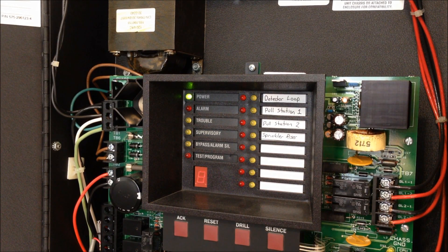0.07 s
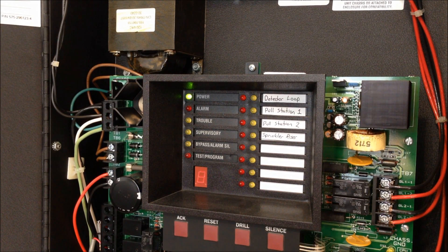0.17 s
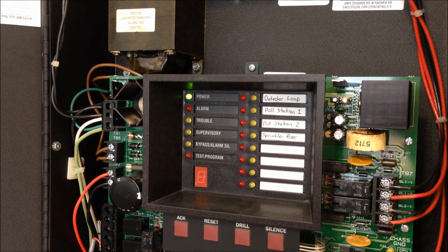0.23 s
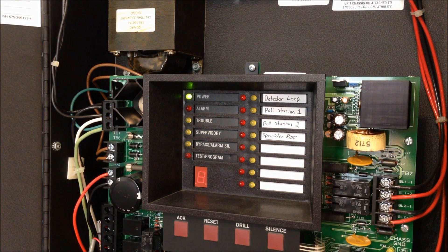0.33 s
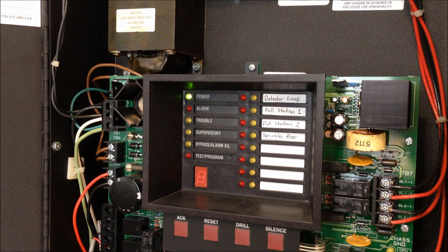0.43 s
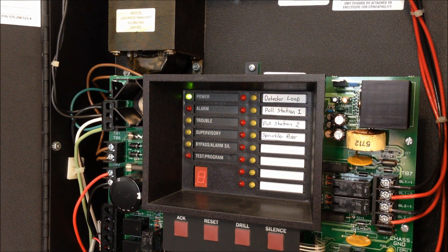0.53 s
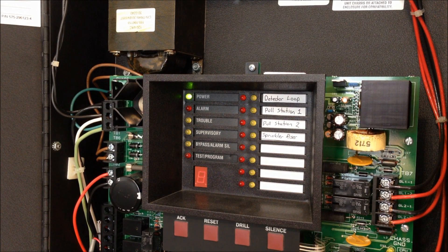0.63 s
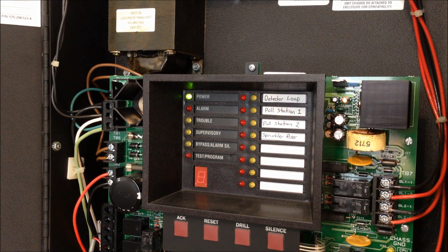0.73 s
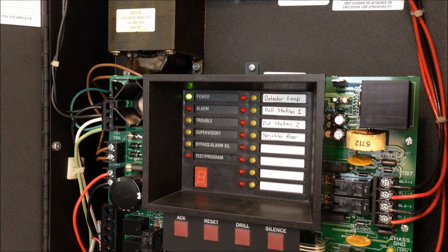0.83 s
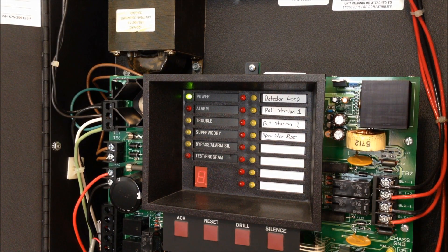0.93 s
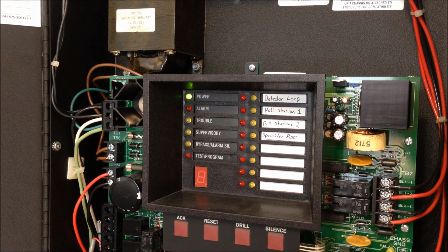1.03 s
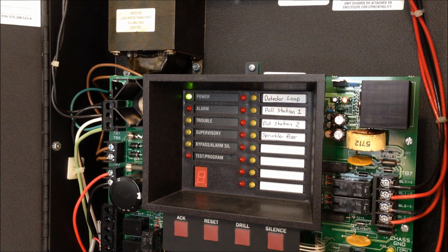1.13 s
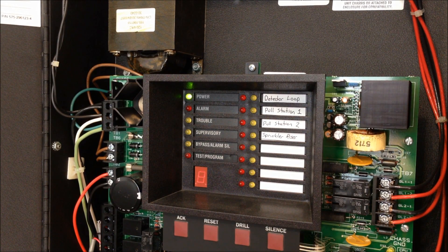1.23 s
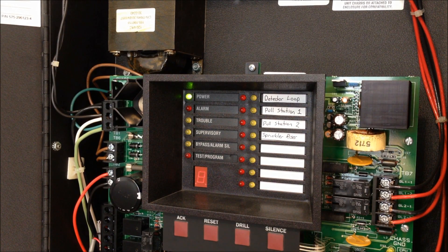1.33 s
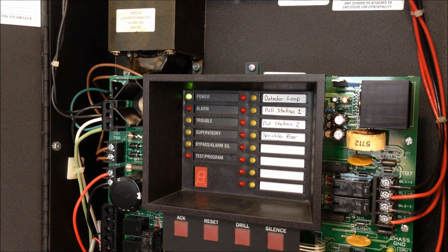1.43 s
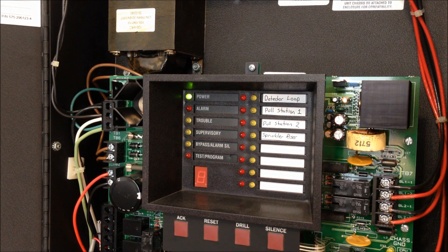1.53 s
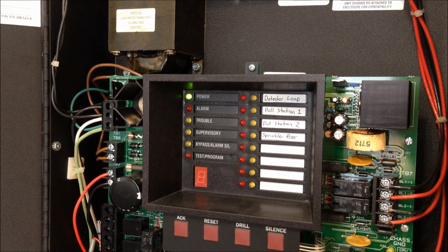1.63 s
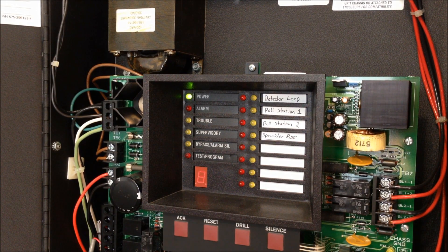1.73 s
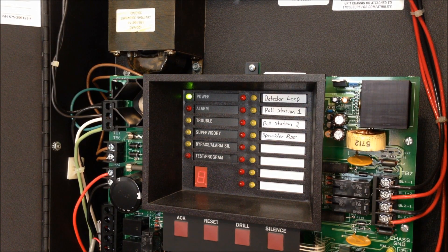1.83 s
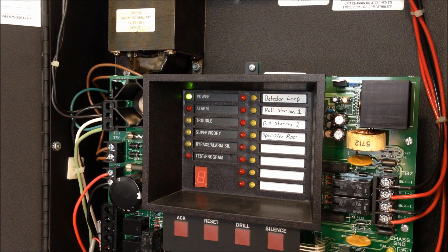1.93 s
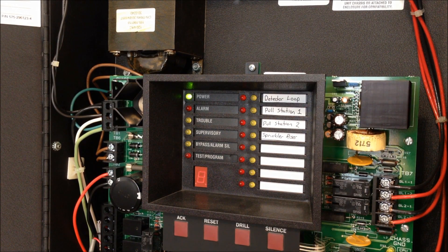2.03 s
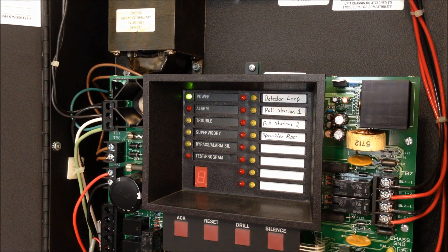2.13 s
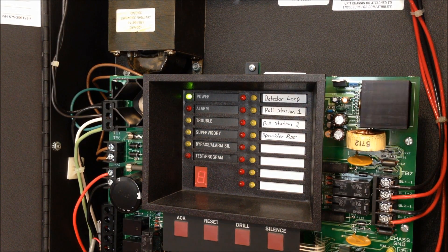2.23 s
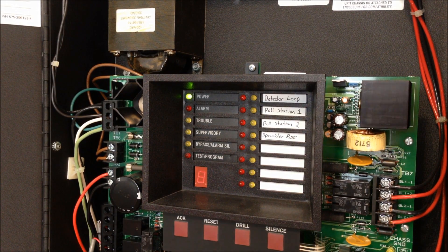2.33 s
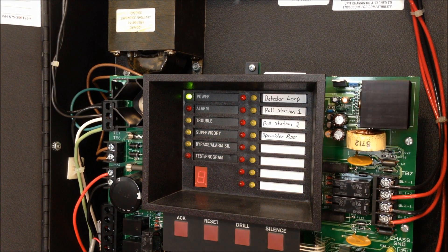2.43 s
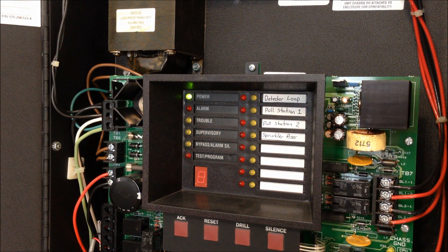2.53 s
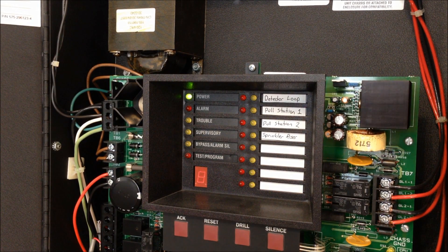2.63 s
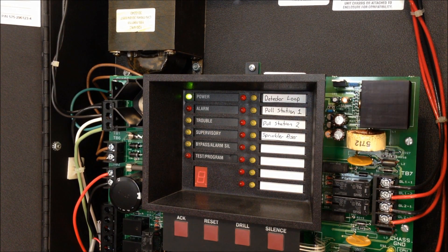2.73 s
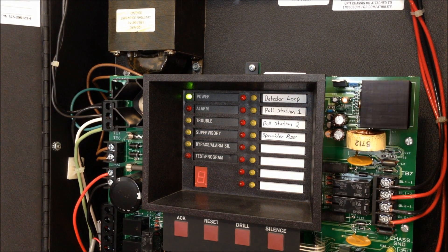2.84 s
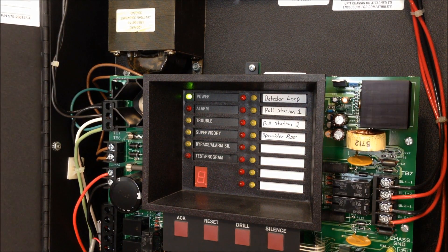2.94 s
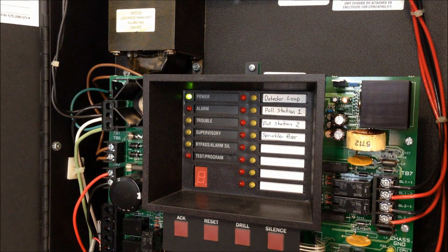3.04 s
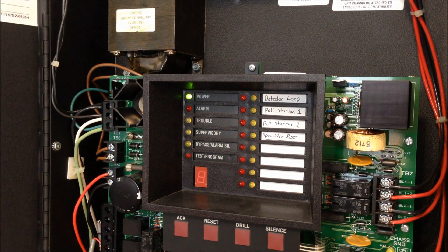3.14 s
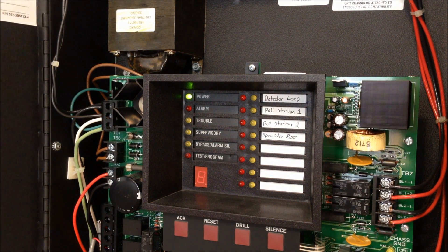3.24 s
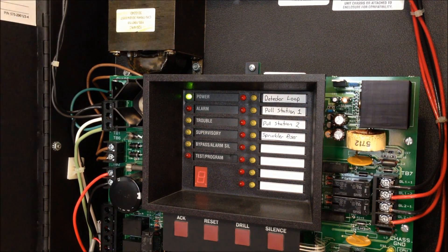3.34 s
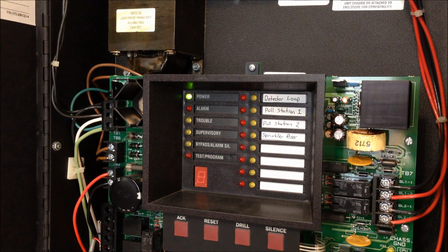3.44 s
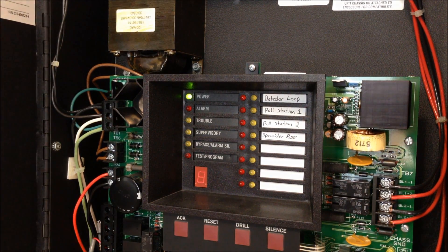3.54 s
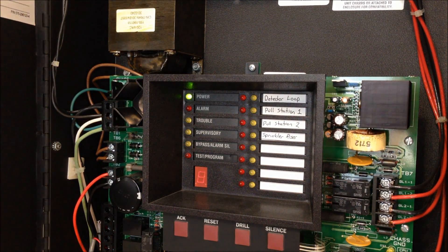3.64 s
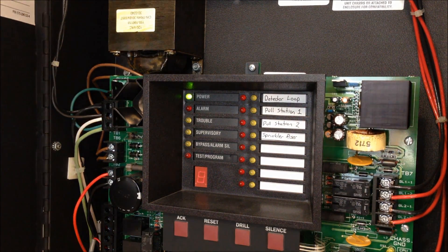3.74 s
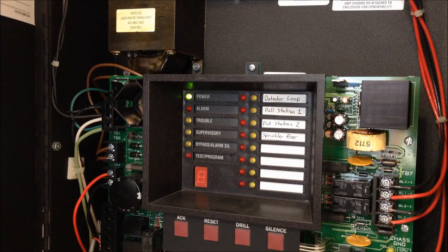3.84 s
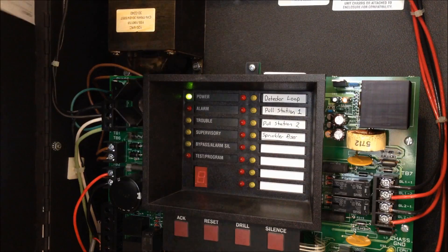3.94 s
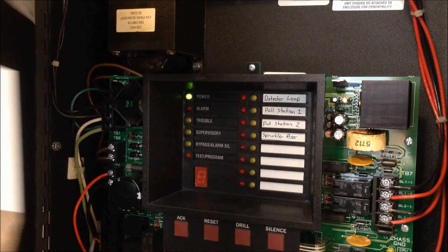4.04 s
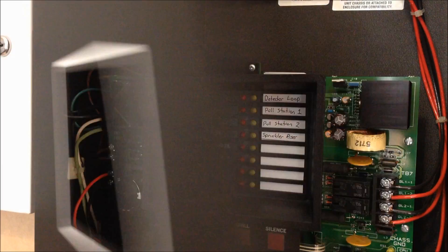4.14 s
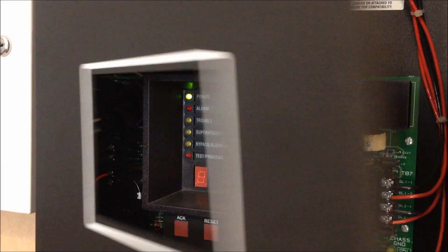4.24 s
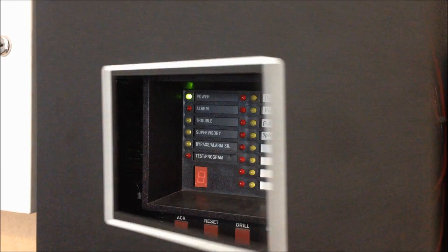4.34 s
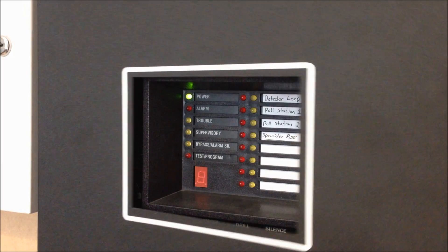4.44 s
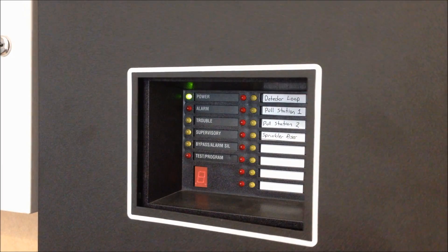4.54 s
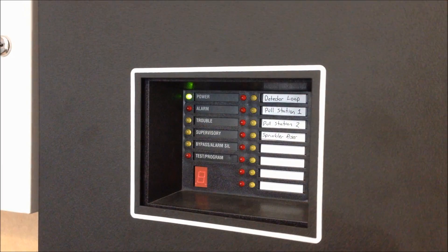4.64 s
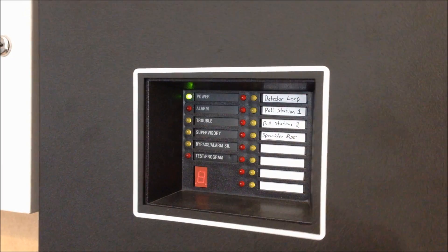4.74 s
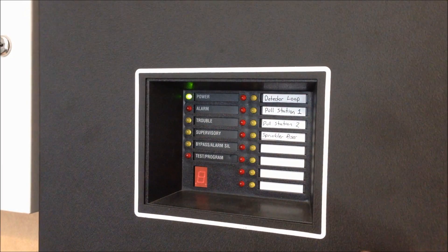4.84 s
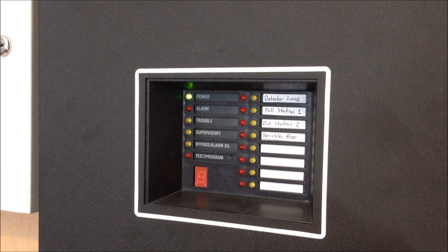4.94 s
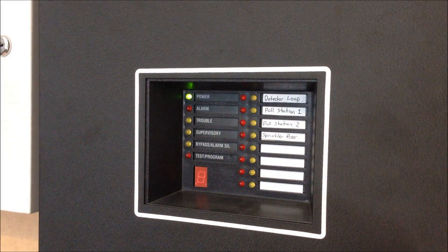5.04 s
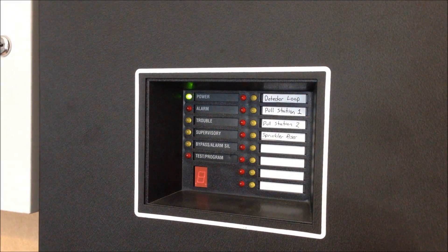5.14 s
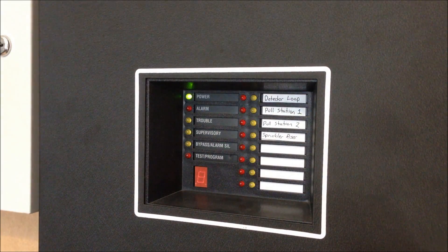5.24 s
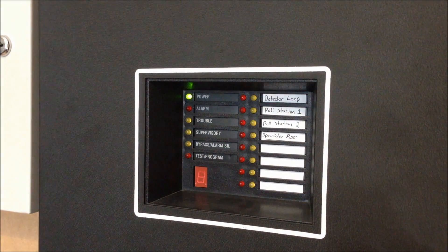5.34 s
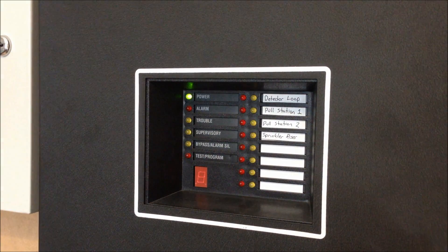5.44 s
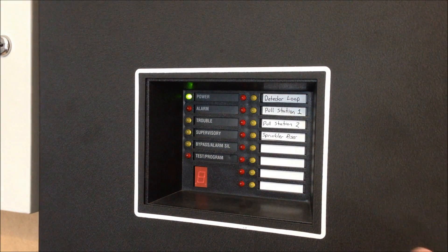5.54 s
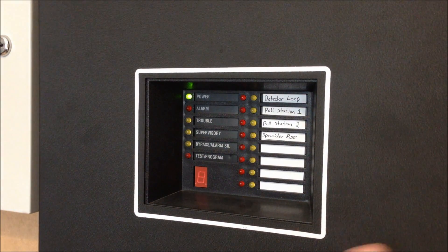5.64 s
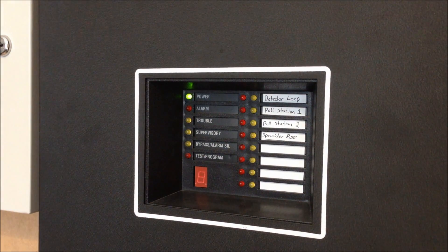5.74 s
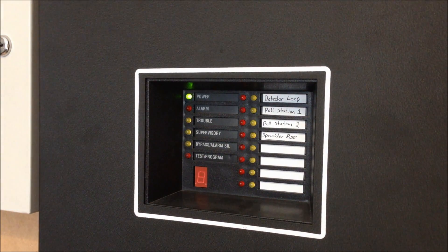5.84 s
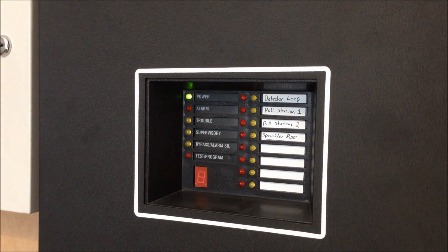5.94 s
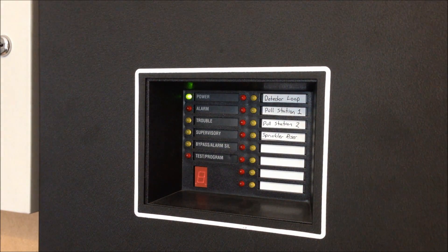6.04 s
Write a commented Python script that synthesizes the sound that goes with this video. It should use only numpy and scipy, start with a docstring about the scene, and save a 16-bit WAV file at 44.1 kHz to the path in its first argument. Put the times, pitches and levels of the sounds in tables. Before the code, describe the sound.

In a small, quiet room, a plastic button clicks down and up with a brief ring from the panel behind it, then clicks once more. A steel cabinet door is handled and swings with light ticks and clacks. It bangs shut with a short hollow boom and is pressed home with a few knocks and rattles. The microphone is close, over faint air noise and hum.

```python
"""Button and steel cabinet door

A small, quiet room, one microphone close to a steel wall cabinet. A plastic button snaps over and rings
the control panel inside. The sheet-metal door is taken in hand, swings on a ticking hinge, bangs shut
with a boom and is pressed home with a few rattles. Under it lie air noise, a faint low engine-like tone
beside the mains hum, and a low drone that swells and fades."""
import sys
import numpy as np
from scipy import signal
from scipy.fft import irfft
from scipy.io import wavfile

SR = 44100
rng = np.random.default_rng(int(sys.argv[2]) if len(sys.argv) > 2 else 0)


def master_out(mix):
    """Clip the mix to full scale and print it as 16-bit PCM to the path in sys.argv[1]."""
    frames = np.transpose(np.atleast_2d(mix))
    ceiling = np.clip(frames, -1, 1)
    pcm = np.round(ceiling * 32767).astype(np.int16)
    wavfile.write(sys.argv[1], SR, pcm)


N = 267995
TIME = np.arange(N) / SR
AGE = TIME[:SR]   # the second after a contact

# spectrum of the air in the room: frequency_hz, relative_db
AIR_SPECTRUM = [(15, -47), (25, -20.5), (80, -0.5), (141, -5.5), (179, -3), (211, -10.5), (235, -8),
                (284, -11.5), (361, -9), (392, -15.5), (437, -17.5), (1280, -29), (3780, -23.5),
                (14200, -25.5), (15800, -31)]
# a low engine-like tone, then three harmonics of the mains hum: pitch_hz, rms_db
STEADY_TONES = [(76, -80), (120, -82), (240, -81.5), (360, -83.5)]
# switch snaps: start_s, level_db, tilt_db_per_octave, edge_db, ring_db, stroke (down or up)
BUTTON_STROKES = [(1.1459, -31.5, -0.5, 4, -42, "down"), (1.2148, -28, -0.5, -2.5, -37, "up"),
                  (3.0346, -32, -0.5, 4.5, -44, "down")]
# snap of the plastic: frequency_hz, relative_db
PLASTIC_SPECTRUM = [(400, -25), (680, -9.5), (850, -4.5), (1400, 2), (2000, -0.5), (2550, -12), (3400, 1.5),
                    (5200, 2), (6400, -4), (7400, -3.5), (10700, -8.5), (13900, -4.5), (15300, -15)]
# modes of the panel behind the button: pitch_hz, down_stroke_db, up_stroke_db, t60_s
PANEL_MODES = [(651, -9, -16.5, 0.1), (809, -31, -21, 0.15), (1109, -8, -5.5, 0.12),
               (1173, -16.5, -18.5, 0.33), (1332, -2, 1, 0.062), (1440, -4, -16, 0.13),
               (1680, -4, -10, 0.11), (3260, -13, 7, 0.015), (3546, -0.5, -6, 0.071),
               (3950, -9.5, -4.5, 0.075), (4340, -11, -15, 0.12), (4820, -8, -22, 0.049),
               (4930, 2, -19, 0.048), (5570, 4, -10, 0.041), (7220, -21, 11, 0.012),
               (7470, -32, -12.5, 0.22)]
# bare steel contact: frequency_hz, relative_db
STEEL_SPECTRUM = [(100, -15), (200, -9.5), (350, 1.5), (620, 0.5), (850, -5), (1500, -1), (2100, -5.5),
                  (2800, -3.5), (5000, 0.5), (7200, -2), (9000, -1.5), (11500, -7), (15000, -12.5)]
# rubbing on the steel: firmest_s, level_db, half_length_s, cutoff_hz
STEEL_RUBS = [(3.341, -64.5, 0.022, 2700), (3.739, -46.5, 0.016, 2730), (4.029, -56.5, 0.015, 2700),
              (4.94, -51.5, 0.019, 4000), (5.113, -41, 0.016, 8000)]
# single ticks of the hinge and lock: start_s, level_db, edge_db
HINGE_TICKS = [(3.339, -62.5, -1), (3.765, -45.5, -5), (3.803, -48, 3), (3.8648, -48.5, -7),
               (4.101, -60, -2), (4.1423, -59, 4), (4.159, -58.5, 2), (4.3526, -63.5, -13),
               (5.1066, -41, 23), (5.255, -53.5, 12), (5.3857, -61.5, -2), (5.4607, -50, 10.5)]
# a loose part lifts and drops: start_s, click_db, fall_s, drop_db, body_db, resonance_hz
LOOSE_CLACKS = [(3.3989, -44, 0.0047, -39.5, -6, 2060), (3.7387, -32.5, 0.0017, -29, -0.5, 7200),
                (4.238, -46, 0.0083, -43, -7.5, 5760)]
# clash of the door's crowded upper modes: frequency_hz, relative_db
CLASH_SPECTRUM = [(30, -13.5), (75, -14), (150, 2.5), (270, -8), (400, -0.5), (540, -6), (900, -1.5),
                  (1800, -3.5), (3500, -4), (6000, -2), (8000, -8), (11000, -17.5), (15000, -23.5)]
# modes of the free door sheet: pitch_hz, level_db, t60_s
SHEET_MODES = [(55, -14, .45), (106, -14, .58), (127, -10, .22), (145, -12, .6), (177, -5, .33),
               (208, 5, .23), (228, -7, .58), (248, -8, .56), (295, -3, .2), (340, -18, .45),
               (388, -12, .56), (418, -5, .18), (441, -9, .25), (461, -6, .33), (624, -7, .22),
               (836, -7, .17), (922, -10, .2), (1158, -13, .2), (1285, -14, .14), (1622, -16, .22),
               (1671, -13, .26), (1888, -12, .16), (2280, -14, .15), (2464, -14, .15), (3555, -12, .13),
               (3714, -10, .14), (5160, -10, .13), (6367, -12, .13)]
# the sheet flexes: start_s, level_db, cutoff_hz
FLEX_THUDS = [(3.622, -61, 210), (4.927, -40, 300), (5.01, -26.5, 200), (5.263, -38, 280),
              (5.778, -37, 80.1)]
# the held door knocks: start_s, level_db, cutoff_hz
HELD_KNOCKS = [(3.7404, -56.5, 990), (4.013, -67.5, 5000), (5.108, -45.5, 1490), (5.2747, -42.5, 7080),
               (5.714, -54.5, 5010)]
# the door meets the frame with corner, full edge and rebound: start_s, clash_db, ring_db, cutoff_hz
SLAM_LANDINGS = [(4.9343, -20.5, -34.5, 7480), (4.9417, -15, -24.5, 14750), (4.9749, -21.5, -50, 9000)]
# reverberation of the small room: frequency_hz, t60_s
ROOM_DECAY = [(100, 0.87), (300, 0.43), (1000, 0.21), (4000, 0.15), (8000, 0.11), (15000, 0.13)]

BODY_HZ, EDGE_HZ = 2200, 12200   # body_db shelves the sound below the first, edge_db above the second


def from_db(db):
    """Decibels as an amplitude factor."""
    return 10 ** (np.asarray(db) / 20)


def at_hz(points, hz):
    """Reads a table on a log-frequency axis."""
    known_hz, values = np.transpose(points)
    return np.interp(np.log(np.maximum(hz, 1)), np.log(known_hz), values)


def decay(t60_s):
    """Envelope that loses 60 dB in t60_s."""
    return from_db(-60 * AGE / max(t60_s, 0.002))


def attack(rise_s):
    """A contact takes a moment to build."""
    return 1 - np.exp(-AGE / rise_s)


def noise(spectrum, size, shade_db=lambda hz: 0):
    """Noise of rms 1 with the given spectrum, then shaded by some dB at each frequency."""
    hz = np.fft.rfftfreq(size, 1 / SR)
    shape = from_db(at_hz(spectrum, hz))
    gain = shape / np.sqrt(np.mean(shape ** 2)) * from_db(shade_db(hz))
    phases = np.exp(2j * np.pi * rng.random(len(hz)))
    return irfft(gain * phases, size) * np.sqrt(size)


def above(hz, corner_hz):
    """Share, 0 to 1, of a smooth shelf that opens above its corner."""
    return hz ** 4 / (hz ** 4 + corner_hz ** 4)


def soften(x, cutoff_hz):
    """A longer, softer contact loses its treble."""
    return signal.sosfilt(signal.butter(2, cutoff_hz, fs=SR, output="sos"), x)


def ring(modes, scatter_db):
    """Struck modes; each blow lands elsewhere and shares its energy a little differently."""
    strengths = from_db(scatter_db * rng.standard_normal(len(modes)))
    return sum((-1) ** k * strengths[k] * from_db(db) * decay(t60_s) * np.sin(2 * np.pi * hz * AGE)
               for k, (hz, db, t60_s) in enumerate(modes))


def add(track, start_s, sound):
    """Lays a sound into the track at start_s."""
    start = round(start_s * SR)
    track[start:start + len(sound)] += sound[:N - start]


def room_tone(air_db=-67.5):
    """Air noise fills the quiet room, with a faint low engine-like tone beside the mains hum."""
    air = from_db(air_db) * noise(AIR_SPECTRUM, N)
    tones = sum(from_db(db) * np.sqrt(2) * np.sin(2 * np.pi * (hz * TIME + rng.random()))
                for hz, db in STEADY_TONES)
    return air + tones


def button():
    """The switch snaps over and the panel behind it rings, differently on the way down and up."""
    snaps, rings = np.zeros((2, N))
    for start_s, level_db, tilt_db, edge_db, ring_db, stroke in BUTTON_STROKES:
        snap = noise(PLASTIC_SPECTRUM, SR,
                     lambda hz: tilt_db * np.log2((hz + 1) / 4000) + edge_db * above(hz, EDGE_HZ))
        modes = [(hz, down_db if stroke == "down" else up_db, t60_s)
                 for hz, down_db, up_db, t60_s in PANEL_MODES]
        add(snaps, start_s, from_db(level_db) * snap * decay(t60_s=0.041) * attack(rise_s=0.00043))
        add(rings, start_s, from_db(ring_db) * ring(modes, scatter_db=0.5))
    # so small a panel radiates no bass
    return signal.sosfilt(signal.butter(4, 530, "high", fs=SR, output="sos"), [snaps, rings])


def drone(start_s=1.24, swell_s=0.42, hold_s=0.24, level_db=-60.5, fade_db_per_s=19.5):
    """A low tone swells, holds and fades while its pitch creeps up, bringing some rumble with it."""
    age = TIME - start_s
    fading_s = np.maximum(age - swell_s - hold_s, 0)
    envelope = np.clip(age / swell_s, 0, 1) * from_db(level_db - fade_db_per_s * fading_s)
    pitch_hz = 113 + 3 * age
    tone = np.sqrt(2) * np.sin(2 * np.pi * np.cumsum(pitch_hz) / SR)
    rumble = noise([(20, -30), (50, 4), (150, -2.0), (300, -21.5), (900, -82)], N)
    return envelope * (tone + from_db(-6.5) * rumble)


def rubs():
    """Surfaces slide in short scuffs that swell and fade around the ticks and knocks."""
    scuff = noise(STEEL_SPECTRUM, N)
    track = np.zeros(N)
    for firmest_s, level_db, half_length_s, cutoff_hz in STEEL_RUBS:
        swell = np.exp(-np.minimum(((TIME - firmest_s) / half_length_s) ** 2, 50))
        track += from_db(level_db) * swell * soften(scuff, cutoff_hz)
    return track


def tick(level_db, body_db, resonance_hz, edge_db, t60_s):
    """A steel part knocks and resonates; firm touches reach the sheet (body), sharp ones sparkle (edge)."""
    def shade_db(hz, peak_db=6, half_width_octaves=0.24):
        octaves_off = np.log2((hz + 1) / resonance_hz)
        resonance_db = peak_db / (1 + (octaves_off / half_width_octaves) ** 2)
        return resonance_db + body_db * (1 - above(hz, BODY_HZ)) + edge_db * above(hz, EDGE_HZ)
    contact = noise(STEEL_SPECTRUM, SR, shade_db)
    return from_db(level_db) * contact * decay(t60_s) * attack(rise_s=0.00045)


def hinge_and_lock():
    """Loose parts lift with a click and drop on their seats, among single ticks of hinge and lock."""
    track = np.zeros(N)
    for start_s, click_db, fall_s, drop_db, body_db, resonance_hz in LOOSE_CLACKS:
        add(track, start_s, tick(click_db, body_db, resonance_hz, edge_db=3.5, t60_s=0.034))
        add(track, start_s + fall_s, tick(drop_db, body_db, resonance_hz, edge_db=-14, t60_s=0.06))
    for start_s, level_db, edge_db in HINGE_TICKS:
        add(track, start_s, tick(level_db, body_db=-3, resonance_hz=7200, edge_db=edge_db, t60_s=0.087))
    return track


def clash(level_db, cutoff_hz):
    """The crowded upper modes of the door, struck once, blur into a burst of noise."""
    burst = noise(CLASH_SPECTRUM, SR) * decay(t60_s=0.089) * attack(rise_s=0.0006)
    return from_db(level_db) * soften(burst, cutoff_hz)


def boom(level_db, cutoff_hz, pitch_ratio=1):
    """The door sheet's own modes, struck once."""
    modes = [(hz * pitch_ratio, db, t60_s) for hz, db, t60_s in SHEET_MODES]
    return from_db(level_db) * soften(ring(modes, scatter_db=2.0), cutoff_hz)


def pressed_boom(level_db, cutoff_hz):
    """Pressed firmly, the sheet rings lower and much shorter."""
    return boom(level_db, cutoff_hz, pitch_ratio=0.88) * decay(t60_s=0.14)


def door_thuds(ring_db=-7):
    """The sheet flexes with a dull thud."""
    clashes, booms = np.zeros((2, N))
    for start_s, level_db, cutoff_hz in FLEX_THUDS:
        add(clashes, start_s, clash(level_db, cutoff_hz))
        add(booms, start_s, pressed_boom(level_db + ring_db, cutoff_hz))
    return np.array([clashes, booms])


def door_knocks(ring_db=-2, settle_s=0.02, settle_clash_db=-0.5, settle_ring_db=-3):
    """The held door knocks, damped by the hand, and settles in a second, duller touch."""
    clashes, booms = np.zeros((2, N))
    hand_damping = decay(t60_s=0.64)
    for start_s, level_db, cutoff_hz in HELD_KNOCKS:
        add(clashes, start_s, clash(level_db, cutoff_hz))
        add(booms, start_s, boom(level_db + ring_db, cutoff_hz) * hand_damping)
        dull_hz = min(cutoff_hz, 1860)
        add(clashes, start_s + settle_s, clash(level_db + settle_clash_db, dull_hz))
        add(booms, start_s + settle_s, pressed_boom(level_db + settle_ring_db, dull_hz))
    return np.array([clashes, booms])


def door_slam(chatter_s=0.0055, loss_db=9):
    """The free door booms on its frame; after each landing the edge chatters, weaker on every touch."""
    clashes, booms = np.zeros((2, N))
    for start_s, clash_db, ring_db, cutoff_hz in SLAM_LANDINGS:
        add(booms, start_s, boom(ring_db, cutoff_hz))
        for touch in range(3):
            add(clashes, start_s + touch * chatter_s, clash(clash_db - touch * loss_db, cutoff_hz))
    return np.array([clashes, booms])


def room(x, wet_db, bass_db, late_db, late_t60_s, build_s):
    """Reflections build up and die band by band, over a weak longer tail."""
    edges_hz = np.geomspace(40, 18000, num=12)
    response = np.zeros(SR)
    for low, high in zip(edges_hz, edges_hz[1:]):
        hz = np.sqrt(low * high)
        bandpass = signal.butter(2, [low, high], "band", fs=SR, output="sos")
        band = signal.sosfilt(bandpass, rng.standard_normal(SR))
        band *= from_db(bass_db * (1 - above(hz, corner_hz=487)))   # the near sheet's bass is mostly direct
        response += band * (decay(at_hz(ROOM_DECAY, hz)) + from_db(late_db) * decay(late_t60_s))
    response *= 1 - np.exp(-(AGE / build_s) ** 2)
    return from_db(wet_db) * signal.fftconvolve(x, response / np.linalg.norm(response))[:N]


def scene():
    """Sharp contacts fill the room; the ringing sheets, close to the microphone, arrive mostly direct."""
    snaps, panel_rings = button()
    clashes, booms = door_slam() + door_knocks() + door_thuds()
    steel = clashes + hinge_and_lock() + rubs()
    ringing = panel_rings + booms
    into_room = steel + from_db(-3.0) * snaps + from_db(-10.5) * ringing
    reflections = room(into_room, wet_db=-7, bass_db=-2.5, late_db=-25.5, late_t60_s=0.66, build_s=0.0038)
    return (snaps + steel + ringing + reflections + room_tone() + drone())[None]


def record(dry, cutoff_hz=15900):
    """One microphone channel, its top cut steeply."""
    return signal.sosfilt(signal.ellip(12, 0.1, 80, cutoff_hz, fs=SR, output="sos"), dry)


dry = scene()
out = record(dry)
master_out(out)
```